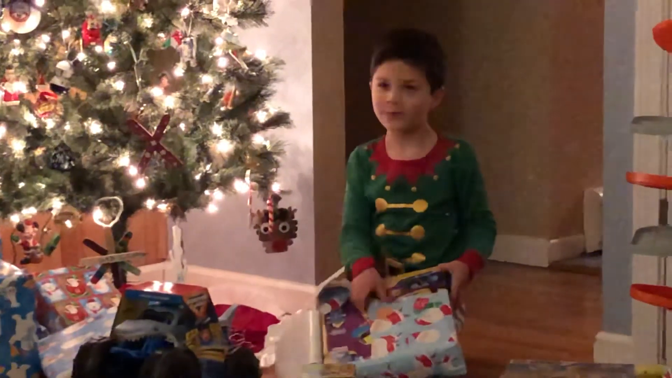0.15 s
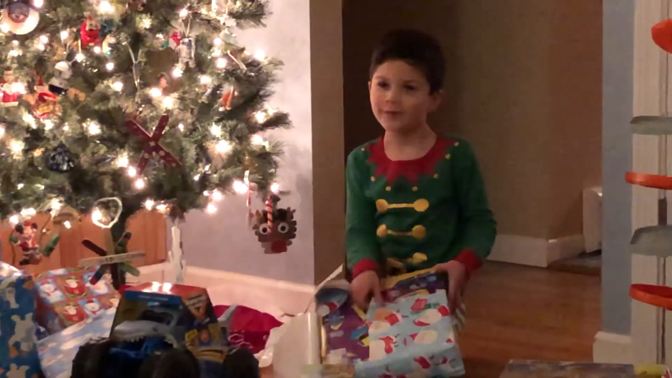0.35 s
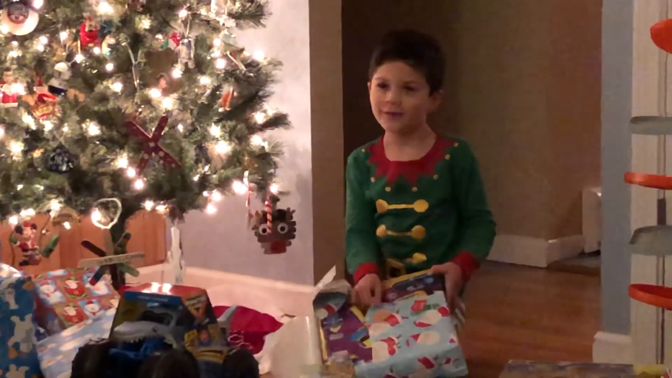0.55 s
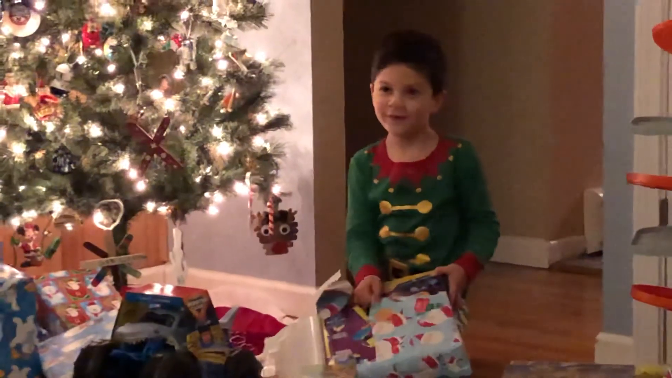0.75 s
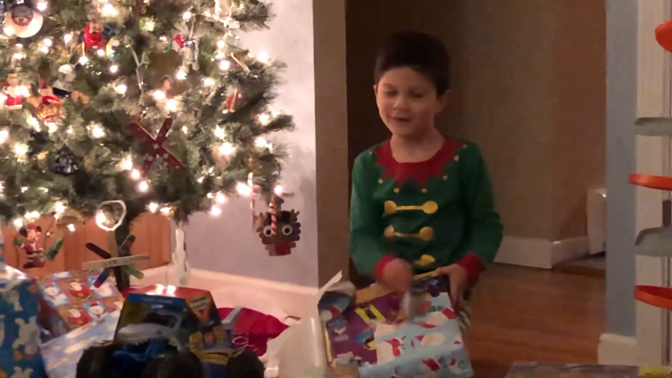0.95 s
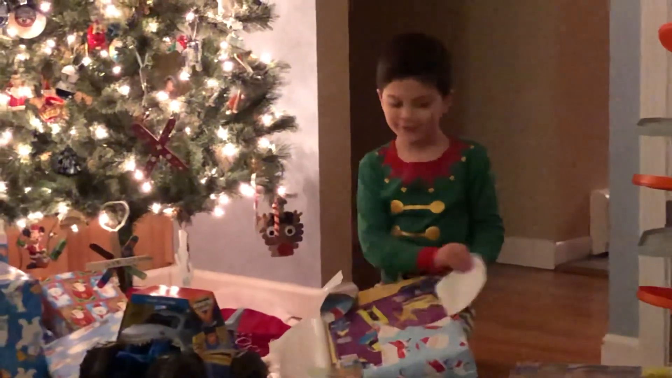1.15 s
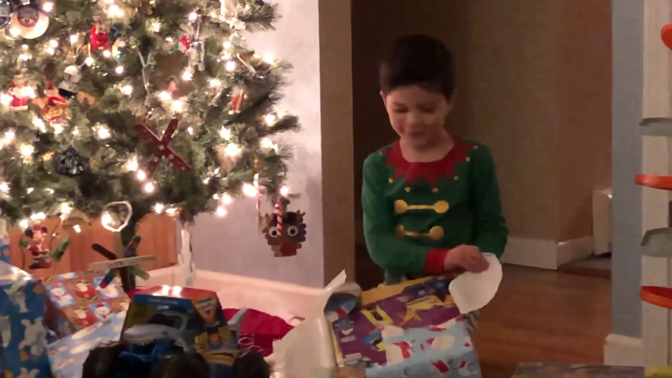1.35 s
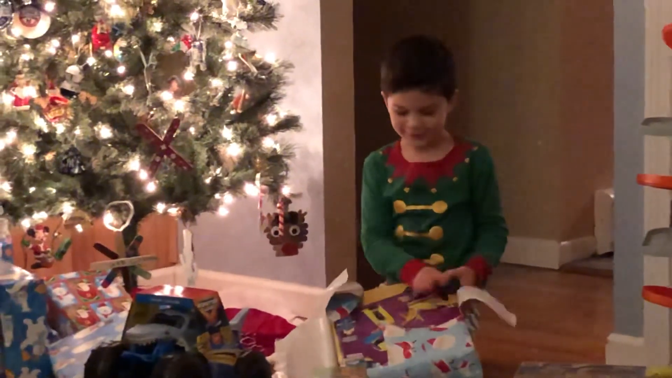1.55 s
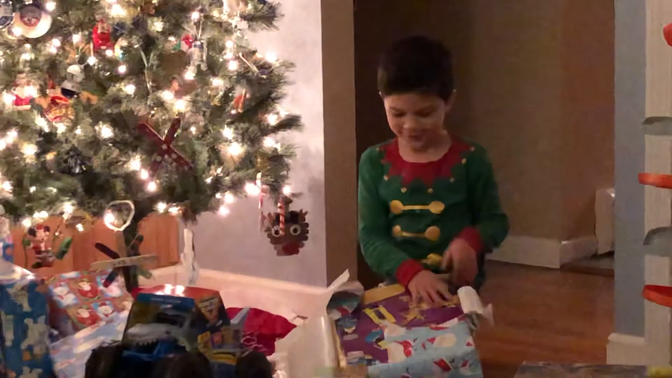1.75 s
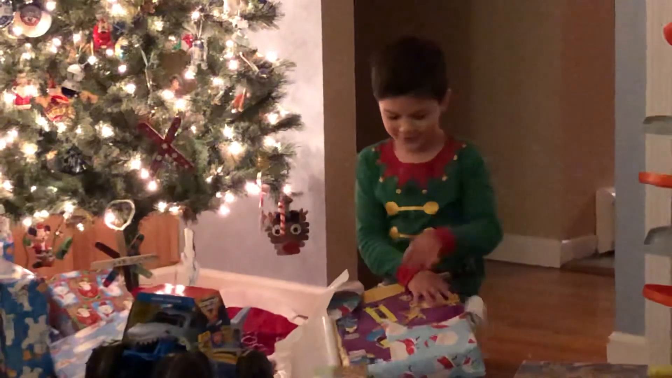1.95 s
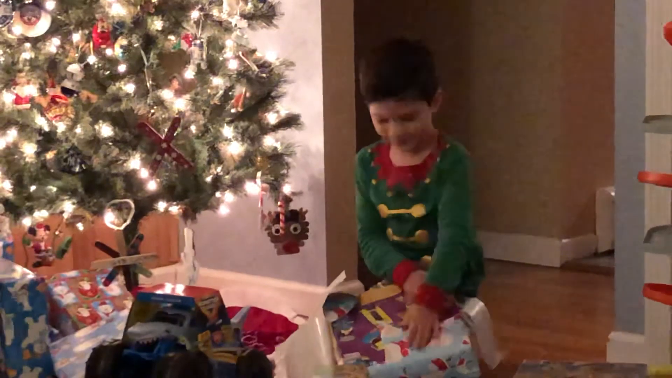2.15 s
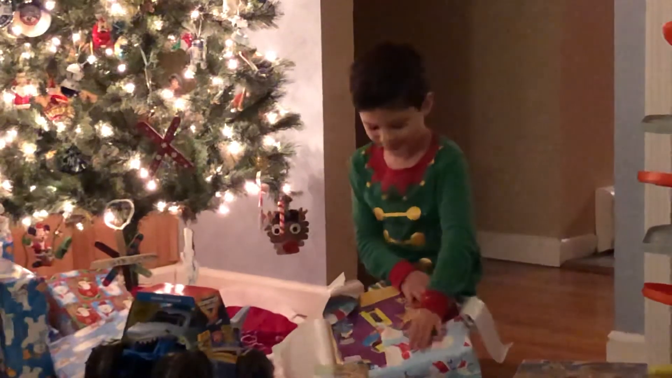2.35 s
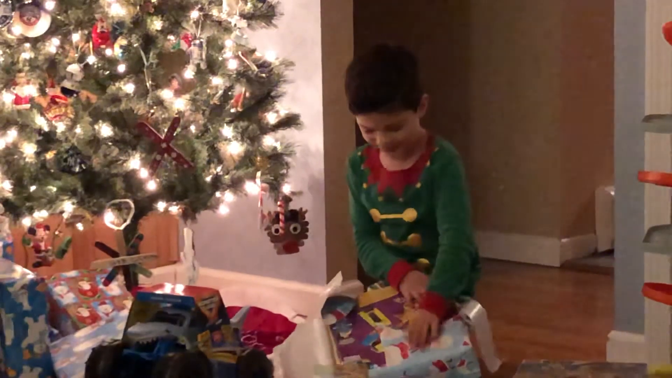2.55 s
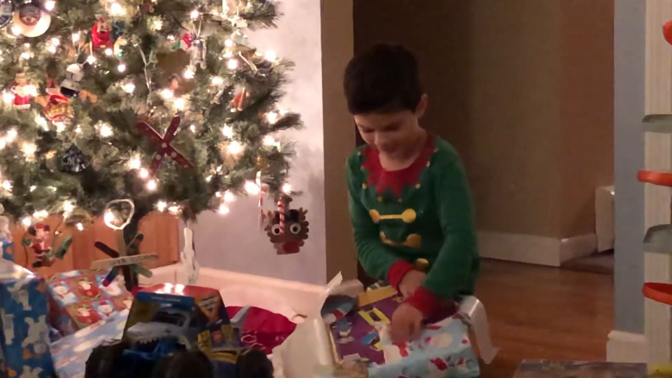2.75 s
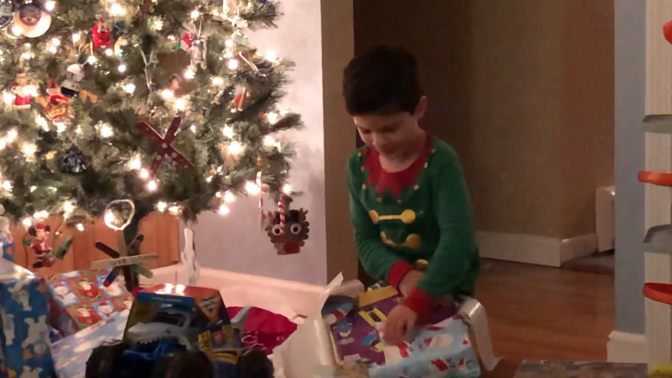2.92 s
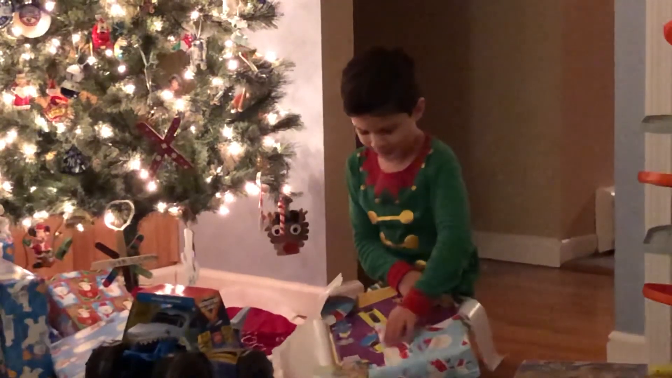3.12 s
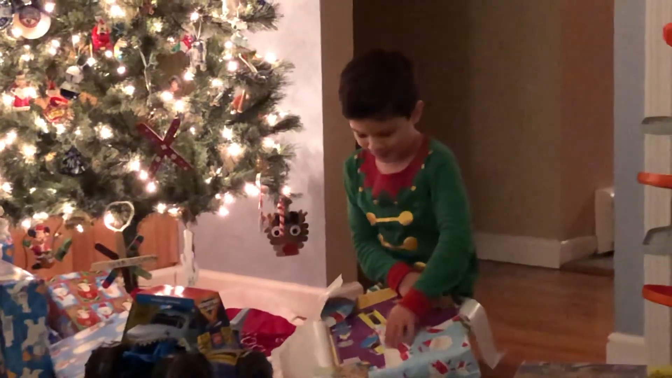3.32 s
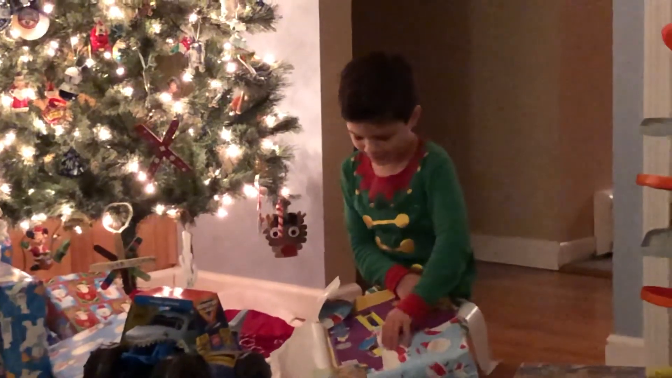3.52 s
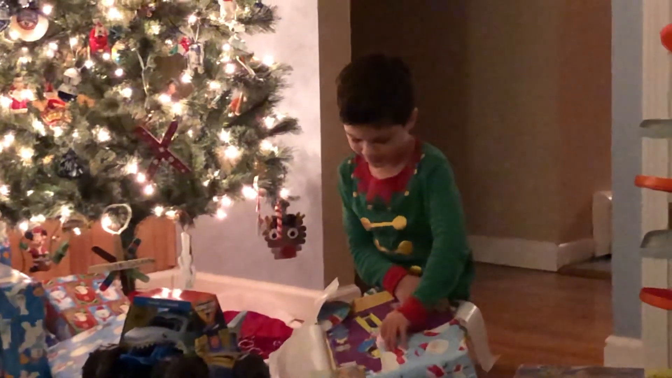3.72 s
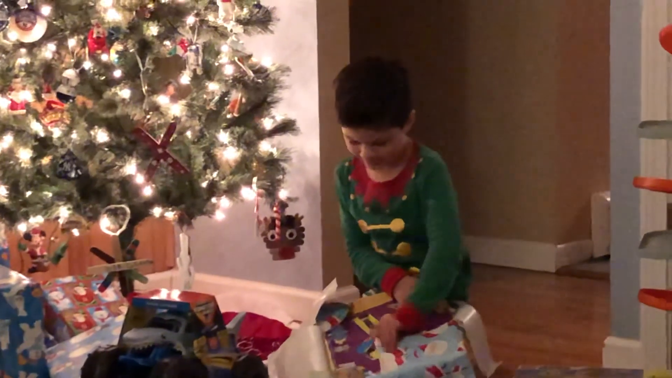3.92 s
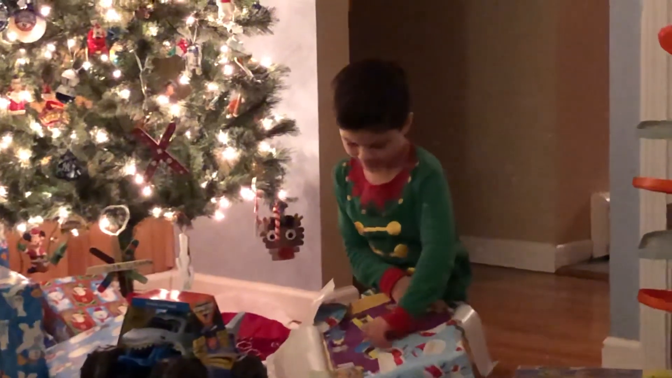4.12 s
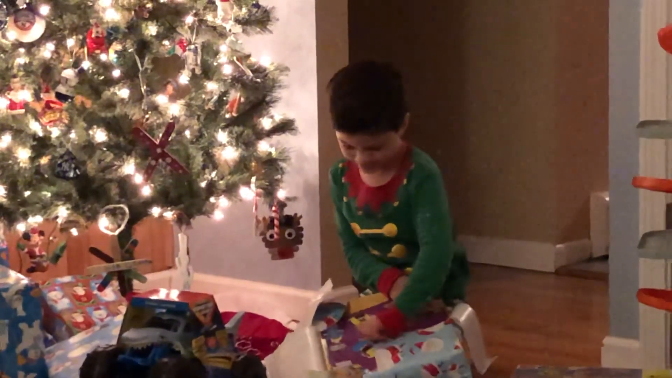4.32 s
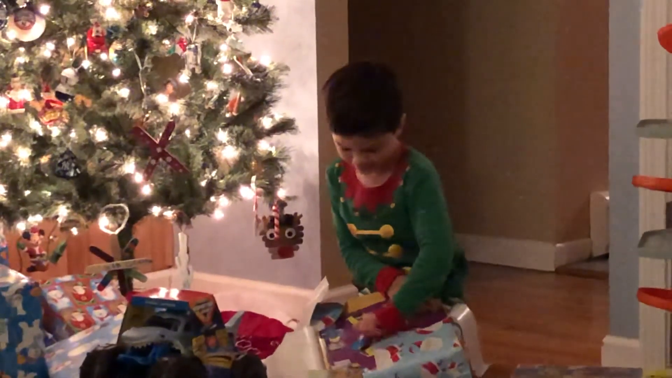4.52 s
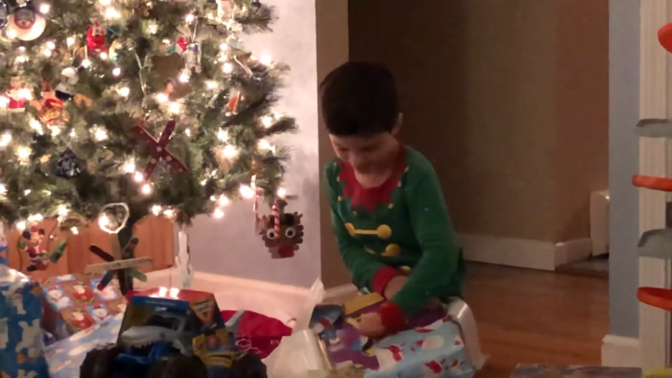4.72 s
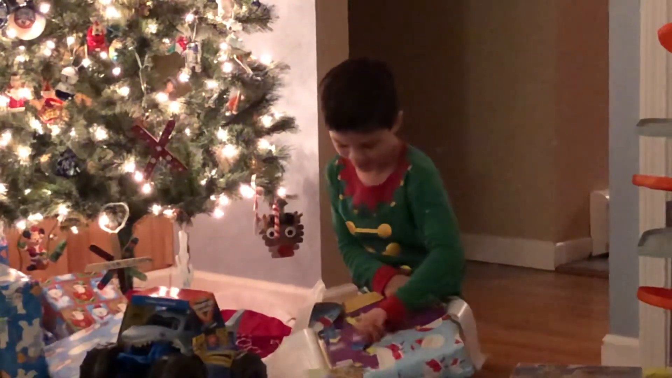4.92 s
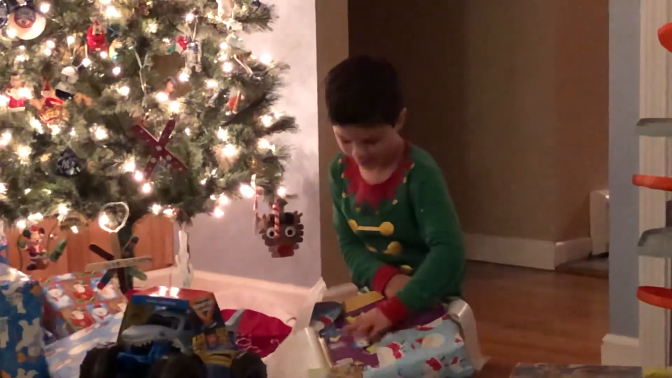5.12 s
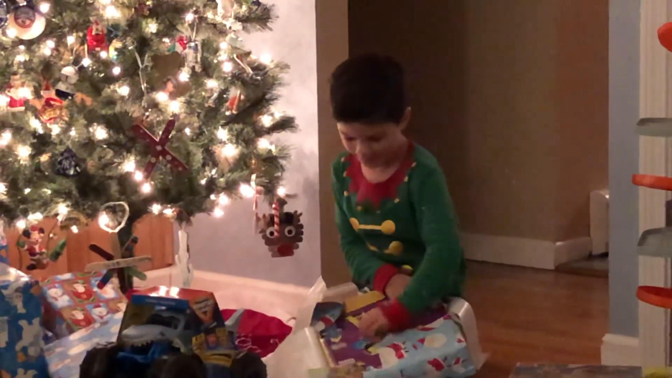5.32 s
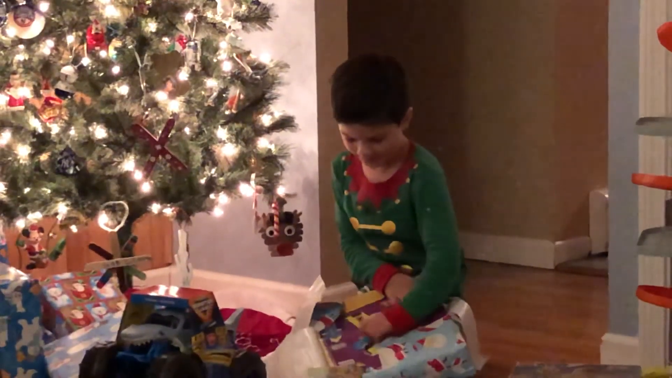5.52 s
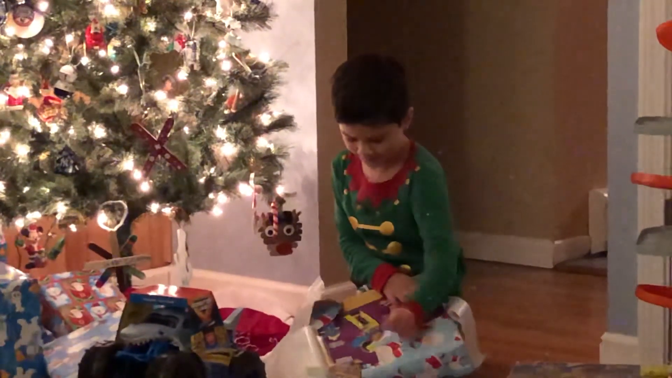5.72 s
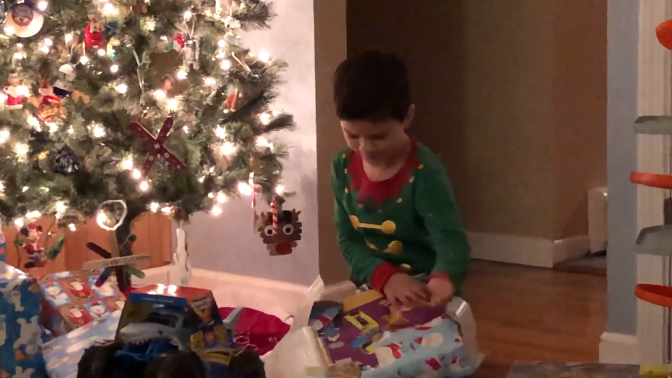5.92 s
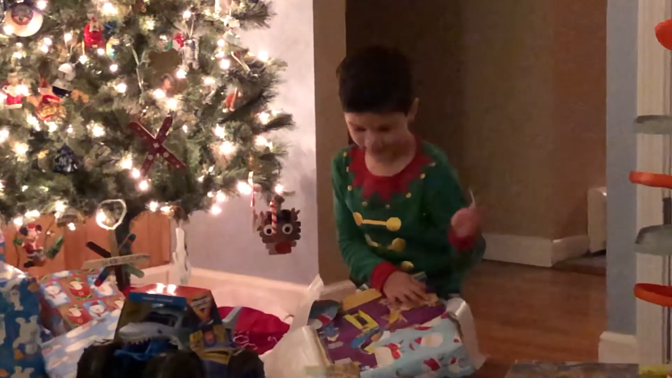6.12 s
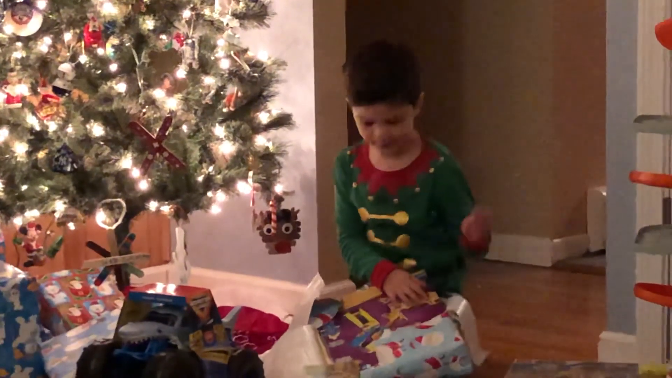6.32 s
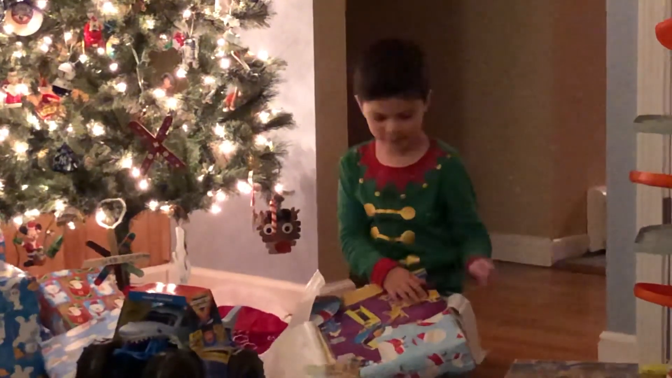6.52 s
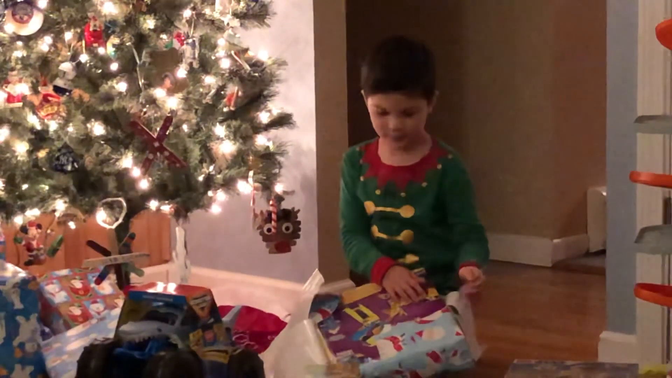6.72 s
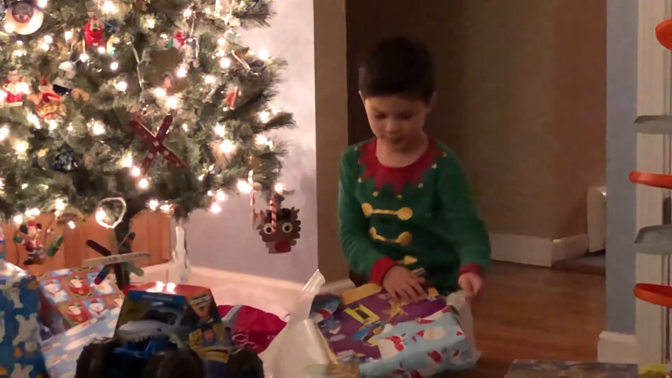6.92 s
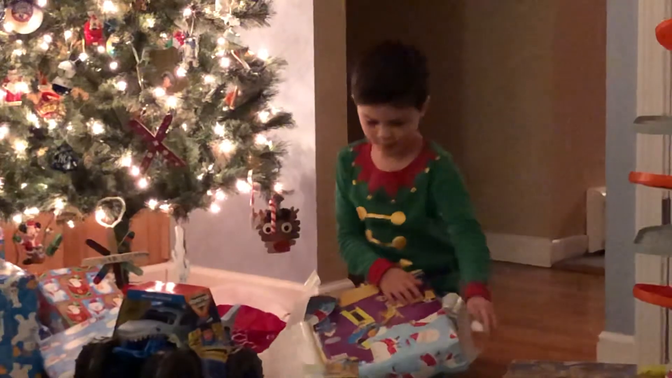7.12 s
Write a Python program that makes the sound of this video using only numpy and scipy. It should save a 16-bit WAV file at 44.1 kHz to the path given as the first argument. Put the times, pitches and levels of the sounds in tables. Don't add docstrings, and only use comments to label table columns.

```python
import sys
import numpy as np
from scipy import signal
from scipy.fft import rfft, irfft
from scipy.io import wavfile

SR = 44100
rng = np.random.default_rng(int(sys.argv[2]) if len(sys.argv) > 2 else 0)


def int16_out(signal):
    q = np.round(np.clip(np.atleast_2d(signal).T, -1, 1) * 32767)
    wavfile.write(sys.argv[1], SR, q.astype(np.int16))


def volts_from_db(level):
    exponent = np.asarray(level, float) / 20
    return 10 ** exponent


N = 315756


def rms_one(x):
    return x / np.sqrt(np.mean(x ** 2) + 1e-20)


def peak_one(x):
    return x / np.max(np.abs(x))


def at_hz(points, hz):
    table_hz, values = np.array(points).T
    return np.interp(np.log(hz), np.log(table_hz), values)


def coloured(x, spectrum):
    hz = np.maximum(np.arange(len(x) // 2 + 1) * SR / len(x), 1)
    lowest_hz = spectrum[0][0]
    low_cut = (hz > 0.7 * lowest_hz) * np.minimum(1, hz / lowest_hz) ** 4
    return rms_one(irfft(rfft(x) * volts_from_db(at_hz(spectrum, hz)) * low_cut, len(x)))


def resonate(x, hz, width_hz):
    r = np.exp(-np.pi * width_hz / SR)
    feedback = [1, -2 * r * np.cos(2 * np.pi * hz / SR), r * r]
    return signal.lfilter([(1 - r * r) / 2, 0, (r * r - 1) / 2], feedback, x + 1e-18)


def body(x, modes):
    out = 0
    for k, (hz, width_hz, db) in enumerate(modes):
        out = out + (-1) ** k * volts_from_db(db) * resonate(x, hz, width_hz)
    return out


def drift(rate_hz):
    r = np.exp(-2 * np.pi * rate_hz / SR)
    slow = signal.lfilter([1], [1, -2 * r, r * r], rng.standard_normal(N + SR))
    return rms_one(slow[SR:])


def ticks(per_s, spread_db, clump_db, clumps_per_s):
    sizes = volts_from_db(spread_db * np.minimum(rng.exponential(1, N), 5)) * rng.choice([-1, 1], N)
    born = rng.random(N) < per_s / SR
    return sizes * born * volts_from_db(clump_db * drift(clumps_per_s))


def strokes(rows, fall_db_per_s):
    t, power = np.arange(N) / SR, np.zeros((2, N))
    rise_from_db = -10
    for start, rise, hold, *db in rows:
        on = slice(max(int(start * SR), 0), int((start + rise + hold + 0.3) * SR))
        since = t[on] - start
        rise_db = rise_from_db * np.clip(1 - since / max(rise, 1e-3), 0, 1)
        fall_db = fall_db_per_s * np.maximum(since - rise - hold, 0)
        power[:, on] += volts_from_db(2 * (rise_db - fall_db + np.array(db)[:, None]))
    return np.sqrt(power)


def add(out, s, sound):
    i = max(round(s * SR), 0)
    out[i:i + len(sound)] += sound[:N - i]


# time in seconds, rip level in dB, treble above the rip in dB.
TEAR = [
    (0.70, -68, -4),
    (0.73, -54, -12),
    (0.742, -46, 12.5),
    (0.79, -43, 13),
    (0.876, -37, 6),
    (1.002, -36.5, 4.5),
    (1.09, -42, 9),
    (1.19, -49, 13),
    (1.26, -65, -22),
]
# start, rise and hold in seconds, rip level in dB, treble above it in dB.
RIPS = [(0.0, 0.0033, 0.11, -75.5, 10), (0.154, 0.014, 0.038, -66, 8), (0.255, 0.066, 0.11, -71, 11),
        (0.588, 0.043, .04, -72.5, -1), (1.447, 0.049, 0.17, -86.5, 14), (2.059, .012, 0.061, -66, -3),
        (2.188, 0.068, 0.076, -66.5, 4.5), (2.566, 0.082, .04, -89, 20), (3.07, 0.026, 0.07, -82.5, 8),
        (3.426, 0.0057, 0.045, -77, 12), (3.59, 0.0029, 0.01, -60.5, 12.5), (3.71, 0.1, 0.1, -64.5, 20),
        (3.815, 0.1, 0.16, -53, 4.5), (4.214, 0.078, 0.054, -59.5, 7.5), (4.405, 0.12, .15, -72.5, 3.5),
        (4.854, 0.013, 0.12, -70, 7.5), (5.132, 0.13, 0.037, -73, 14), (5.24, 0.0061, .09, -60, 6),
        (5.568, 0.0028, 0.0068, -44.5, 7.5), (5.592, .012, 0.15, -75, -12), (6.098, 0.15, 0.18, -74.5, 1.5),
        (6.66, 0.021, 0.03, -82, 7), (6.897, .06, 0.045, -76.5, 4)]
# frequency in Hz, level in dB per Hz.
RIP_SPECTRUM = [(530, -78), (900, -7.5), (1250, -1.5), (1380, -3), (2390, 7.5), (2600, 3.5), (3010, 10.5),
                (3610, 8.5), (4750, -6.5), (8000, -3), (10400, -36), (17600, -120)]
# frequency in Hz, level in dB per Hz.
RIP_TREBLE = [(4500, 2), (7500, 0), (10000, 2), (13000, -0.5), (16500, -4.5)]


def tearing():
    t = np.arange(N) / SR
    s, db, bright_db = np.transpose(TEAR)
    levels_db = [np.interp(t, s, db), np.interp(t, s, db + bright_db)]
    tear = ((t >= s[0]) & (t < s[-1])) * volts_from_db(levels_db)
    rows = [(start, rise, hold, db, db + bright) for start, rise, hold, db, bright in RIPS]
    rip, treble = np.hypot(tear, strokes(rows, fall_db_per_s=252))

    fibres = ticks(6000, spread_db=2.0, clump_db=1.3, clumps_per_s=41)
    out = volts_from_db(-7.0) * rip * coloured(fibres, RIP_SPECTRUM)
    out += volts_from_db(-8.0) * treble * coloured(fibres, RIP_TREBLE)

    creases = ticks(90, spread_db=2.8, clump_db=3.0, clumps_per_s=15)
    crackle_hz, crackle_db = 3900, -6
    crackle = resonate(resonate(creases, crackle_hz, 1700), crackle_hz, 3000)
    return out + volts_from_db(crackle_db) * np.minimum(rip, volts_from_db(-59)) * rms_one(crackle)


# start, rise and hold in seconds, sheet and box levels in dB.
RUSTLES = [(0.0, 0.0033, 0.15, -68, -70.5), (.15, 0.012, 0.01, -57, -71), (.25, 0.031, 0.46, -78, -68),
           (.6, 0.014, 0.016, -64, -62), (.70, 0.024, .08, -50, -69), (.8, 0.031, 0.11, -59, -49),
           (.95, 0.12, 0.1, -51, -65.5), (1.45, 0.074, 0.68, -81.5, -76), (2.06, 0.015, 0.14, -69, -60.5),
           (2.29, 0.028, 0.024, -61.5, -57), (2.45, 0.03, 0.49, -94, -68.5), (3.1, 0.12, 0.024, -61, -62),
           (3.424, 0.0061, 0.22, -67, -59), (3.53, 0.019, 0.19, -60.5, -55.5),
           (3.7, 0.13, 0.26, -59, -58.5), (4.22, 0.14, 0.041, -58, -56), (4.44, 0.055, 0.15, -70, -55.5),
           (4.87, 0.016, 0.029, -67, -76), (5.08, 0.017, 0.017, -87, -63.5), (5.15, 0.15, 0.13, -62, -61),
           (5.575, 0.012, 0.083, -59.5, -71), (5.815, 0.0045, 0.011, -85, -61),
           (6.06, 0.054, 0.036, -58.5, -68.5), (6.17, 0.018, 0.18, -68, -81),
           (6.9, 0.051, 0.041, -67.5, -81)]
# frequency in Hz, width in Hz, level in dB.
SHEET = [(334, 31, 0), (615, 51, 4.5), (802, 147, -3), (988, 500, 0), (1215, 474, 1), (1728, 620, -5),
         (2050, 2000, -26)]
# frequency in Hz, width in Hz, level in dB.
BOX = [(126, 11.6, -2), (149, 19, -0.5), (202, 60.4, -0.5), (243.2, 29, 0), (245, 43, -3)]


def rustling():
    sheet, box = strokes(RUSTLES, fall_db_per_s=186)
    grains = ticks(1500, spread_db=2.5, clump_db=3.0, clumps_per_s=30)
    pushes = ticks(200, spread_db=4.0, clump_db=3.5, clumps_per_s=40)
    out = volts_from_db(-4.0) * sheet * rms_one(body(grains, SHEET))
    return out + volts_from_db(-0.5) * box * rms_one(body(pushes, BOX))


# frequency in Hz, level in dB per Hz.
HUSH = [(15, -12), (25, -25), (55, 4), (114, 1.5), (245, 0.5), (304, -5), (445, -6.5), (617, -7),
        (831, -10), (1730, -16), (2270, -17.5), (3700, -19.5), (12200, -26.5), (15200, -26), (16500, -31)]


def house_hush():
    level_db = -67.5 + 0.5 * drift(14.0)
    return volts_from_db(level_db) * coloured(rng.standard_normal(N), HUSH)


# frequency in Hz, time to fall by 60 dB in seconds.
ROOM_T60 = [(100, 0.23), (500, 0.35), (2000, 0.24), (5000, 0.29), (12000, 0.23)]


def room(x):
    first_echo_s, wall_loss_db_at_10k = 0.001, -11.5
    bass_loss_db, bass_hz = -6, 480
    t, edges = np.arange(SR // 2) / SR, 120 * 2 ** np.arange(0, 7.6, 0.5)
    white, tail = rng.standard_normal((2, len(t))), 0
    for k, (low, high) in enumerate(zip(edges, edges[1:])):
        band_pass = signal.butter(2, [low, high], "band", fs=SR, output="sos")
        band = signal.sosfilt(band_pass, white[k % 2])
        loss_db = bass_loss_db * (low <= bass_hz) + wall_loss_db_at_10k * low / 1e4
        decay_db = -60 * t / at_hz(ROOM_T60, np.sqrt(low * high))
        tail = tail + band * volts_from_db(loss_db + decay_db)
    tail = tail * np.clip(t / first_echo_s - 1, 0, 1)
    return signal.fftconvolve(x, tail / np.sqrt(np.sum(tail ** 2)))[:N]


# time in seconds, peak in dB, pitch in Hz, box level in dB.
KNOCKS = [(0.072, -52, 670, -56), (0.634, -45.5, 1740, -48), (0.738, -38.5, 374, -68),
          (1.38, -54, 620, -46.5), (1.566, -53.5, 950, -44), (1.767, -56, 624, -72),
          (1.914, -53.5, 603, -70), (2.07, -51, 657, -64), (2.204, -41.5, 770, -65),
          (2.303, -44.5, 1150, -67), (2.33, -41.5, 704, -73), (2.556, -59, 295, -65),
          (3.189, -67, 640, -66), (3.433, -48, 315, -56), (3.486, -44, 790, -60), (3.521, -37, 714, -68),
          (3.646, -54, 327, -56), (3.779, -44, 620, -40), (3.905, -40, 650, -67), (5.183, -53.5, 625, -60),
          (5.275, -45, 860, -48), (5.579, -29.5, 618, -56), (5.582, -22, 171, -56),
          (5.827, -51.5, 634, -57), (6.061, -52, 365, -68), (6.095, -42.5, 1070, -73),
          (7.021, -48.5, 920, -66), (6.94, -48, 920, -54), (6.972, -44, 900, -70)]


def knocks():
    contact_s = 0.012
    rows = [*KNOCKS, *rub_slips()]
    out, t = np.zeros(N), np.arange(SR // 8) / SR
    for s, db, hz, box_db in rows:
        contact = rng.standard_normal(len(t)) * np.exp(-t / contact_s)
        panel = resonate(resonate(contact, hz, 0.14 * hz), hz, 2.6 * hz)
        sound = volts_from_db(db - 6.5) * peak_one(panel)
        sound += volts_from_db(box_db - 9) * peak_one(body(contact, BOX))
        add(out, s, sound)
    return out


# time in seconds, peak in dB, pitch in Hz, sheet and box levels in dB.
SNAPS = [(0.18, -41.5, 6800, -59, -59), (0.185, -39.5, 4220, -62, -70), (0.635, -44, 3370, -48.5, -75),
         (0.7387, -29, 3380, -33.5, -37), (2.0792, -47.5, 3120, -45, -47.5), (2.1353, -50, 4200, -47, -63),
         (2.2029, -42.5, 3940, -45.5, -51.5), (2.2371, -43, 4420, -45, -66),
         (3.1877, -62, 3700, -44, -56.5), (3.4301, -44, 4170, -50, -54), (3.5203, -58, 3570, -64, -51),
         (3.6014, -39, 6000, -71, -53), (3.693, -46.5, 3430, -44, -46), (3.7332, -52, 3670, -43, -44),
         (3.7777, -42, 4430, -61, -53), (3.9547, -35, 4330, -44, -73), (4.2704, -39, 3600, -75, -68),
         (5.1926, -45.5, 4370, -64, -46.5), (5.2482, -36.5, 5140, -54, -48),
         (5.299, -30.5, 5800, -64, -46.5), (5.3015, -29, 11200, -68, -70), (5.304, -36, 7260, -62, -70),
         (5.5754, -19.5, 6430, -31.5, -35.5), (6.102, -65, 2550, -46, -57)]
# time in seconds, peak in dB, pitch in Hz, sheet level in dB.
CREASES = [(0.5263, -56.5, 4220, -68), (1.4468, -57.5, 3400, -79), (1.7667, -64, 3730, -55),
           (1.801, -66, 2500, -57), (1.8186, -64, 3640, -61), (1.9127, -65.5, 3690, -58),
           (2.606, -68, 4400, -86), (2.6318, -54, 3540, -78), (2.098, -53.5, 5100, -56),
           (4.2174, -63, 4070, -68), (4.8157, -57, 3020, -59), (4.8682, -56, 3580, -58),
           (4.942, -41.5, 11400, -69), (5.495, -50.5, 3430, -49.5), (5.8244, -55, 4460, -58),
           (6.6845, -53, 3560, -59.5)]


def snaps():
    crack_s, sheet_s, thud_s = 0.0013, 0.006, 0.00075
    treble_db, crease_box_db = -11, -93
    out, t = np.zeros(N), np.arange(SR // 8) / SR
    high = signal.butter(2, 7500, "high", fs=SR, output="sos")
    rows = [*SNAPS, *[(*row, crease_box_db) for row in CREASES]]
    for s, db, hz, sheet_db, box_db in rows:
        noise = rng.standard_normal(len(t))
        crack = noise * np.exp(-t / crack_s)
        ring = resonate(resonate(crack, hz, 0.63 * hz), hz, 3.6 * hz)
        sound = volts_from_db(db + 4.0) * peak_one(ring)
        sound += volts_from_db(db + treble_db) * peak_one(signal.sosfilt(high, crack))
        sound += volts_from_db(sheet_db - 2.5) * peak_one(body(noise * np.exp(-t / sheet_s), SHEET))
        sound += volts_from_db(box_db - 1.5) * peak_one(body(t * np.exp(-t / thud_s), BOX))
        add(out, s, sound)
    return out


def rub_slips():
    start_s, slips_per_s, count = 4.485, 34, 7
    early, louder, higher = rng.standard_normal((3, count))
    s = start_s + (np.arange(count) + 0.1 * early) / slips_per_s
    peak_db, box_db = -45.5 + 1.6 * louder, -51 + 2.0 * louder
    hz = 570 * (1 + 0.052 * higher)
    return list(zip(s, peak_db, hz, box_db))


def scene():
    parcel = tearing() + rustling() + knocks() + snaps()
    echoes = volts_from_db(-1.5) * room(parcel)
    return (parcel + echoes + house_hush())[None]


def band_limit(x):
    return signal.sosfilt(signal.butter(12, 16830, fs=SR, output="sos"), x)


def record(dry):
    top_cut = signal.cheby2(14, 60, 16500, fs=SR, output="sos")
    return band_limit(signal.sosfilt(top_cut, dry))


dry = scene()
out = record(dry)
int16_out(out)
```